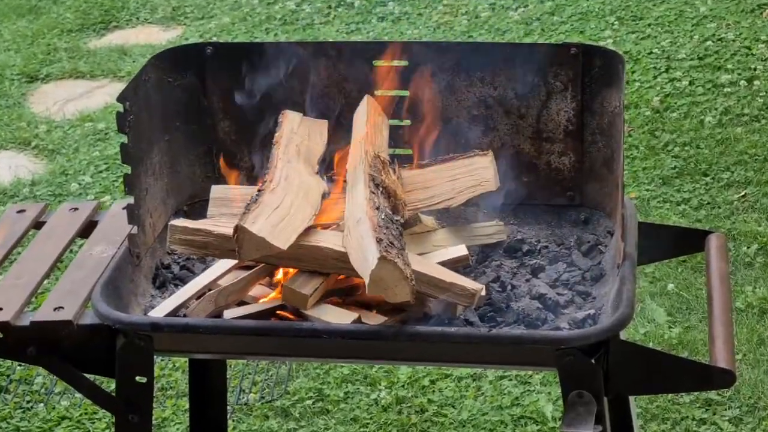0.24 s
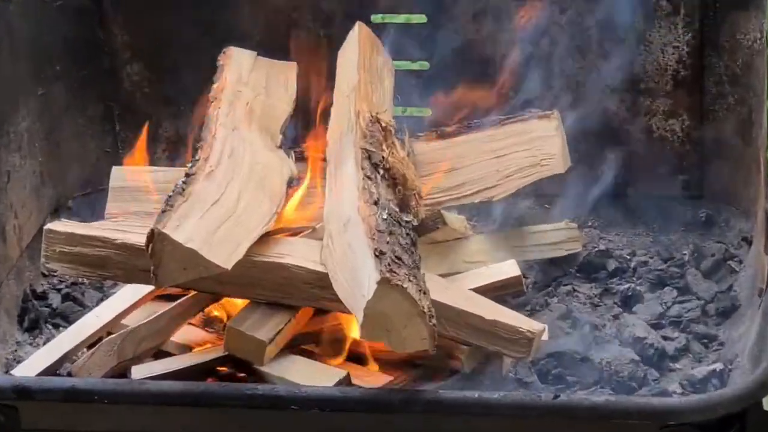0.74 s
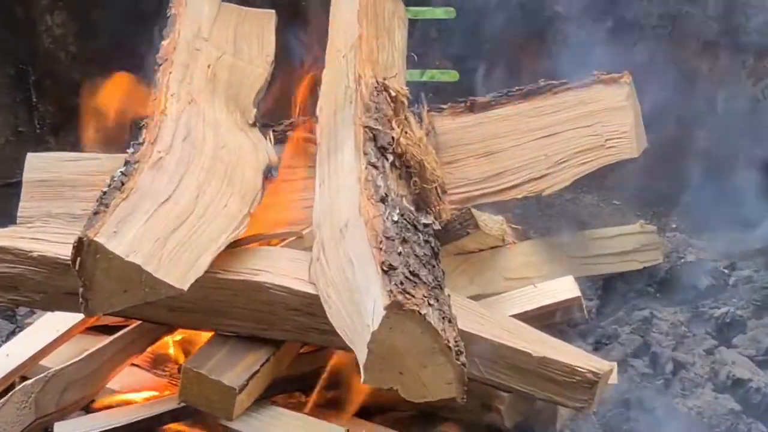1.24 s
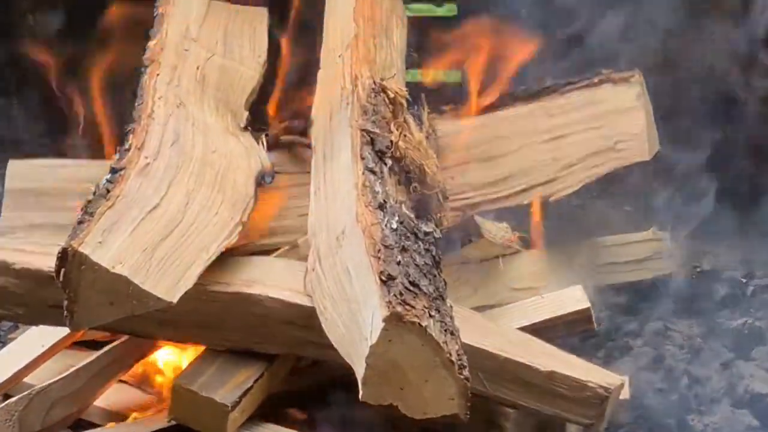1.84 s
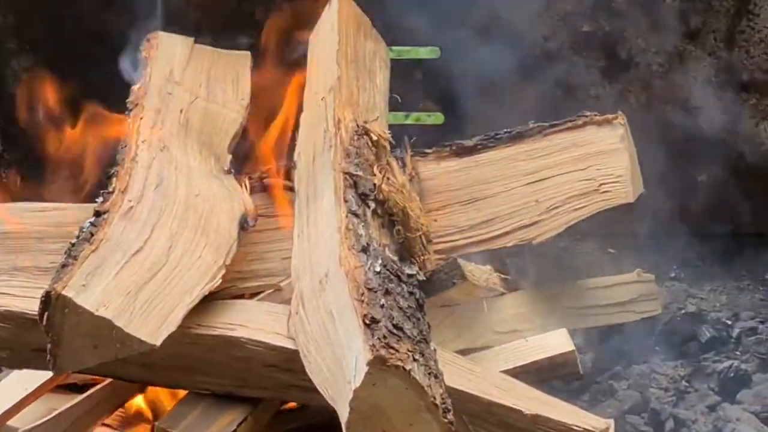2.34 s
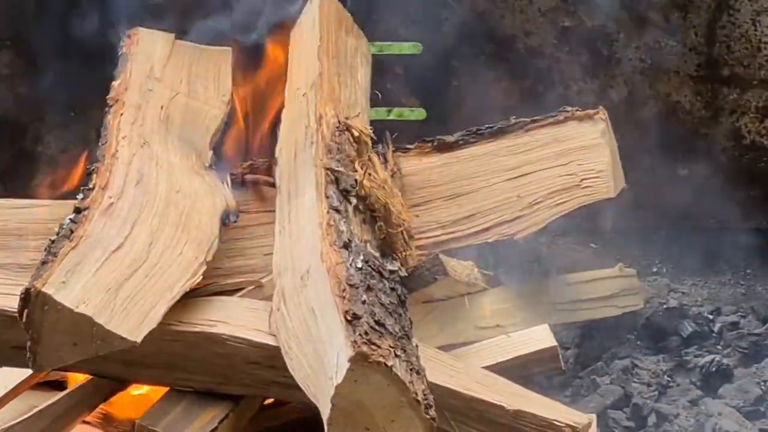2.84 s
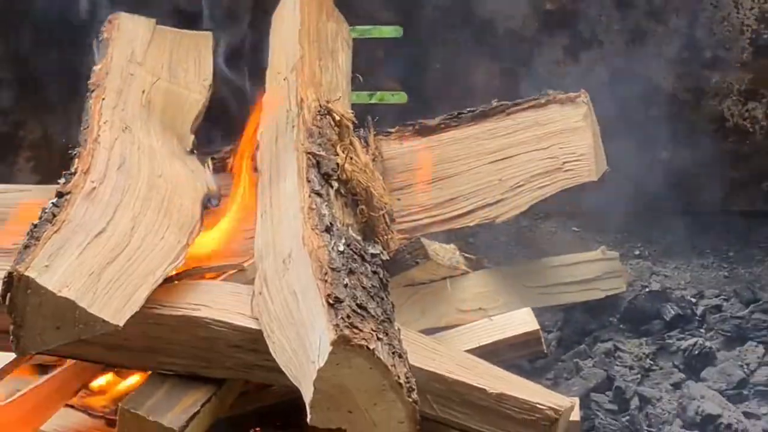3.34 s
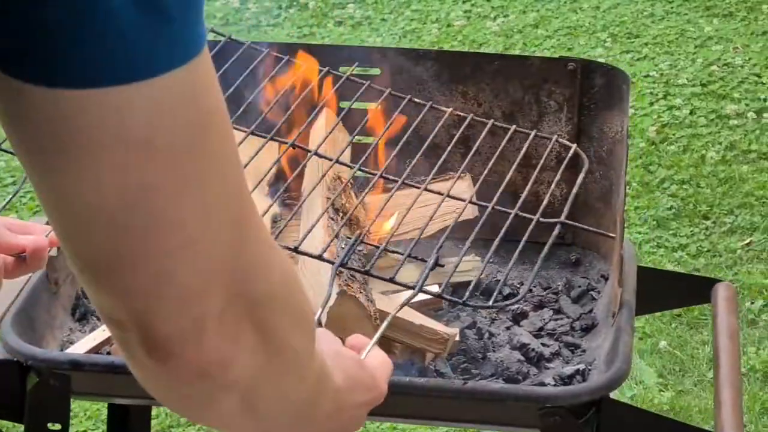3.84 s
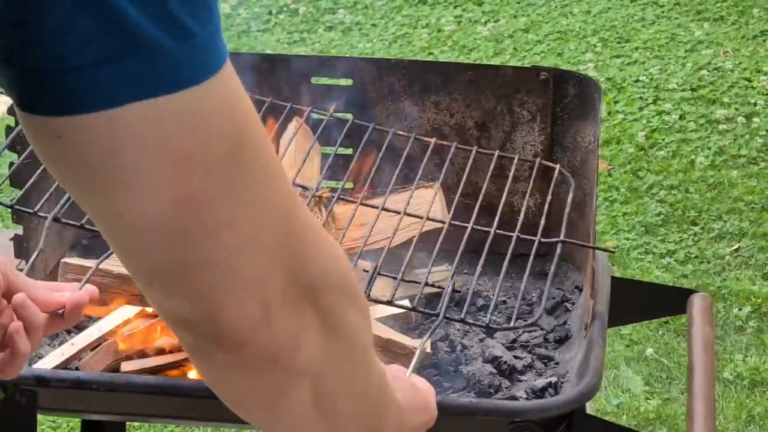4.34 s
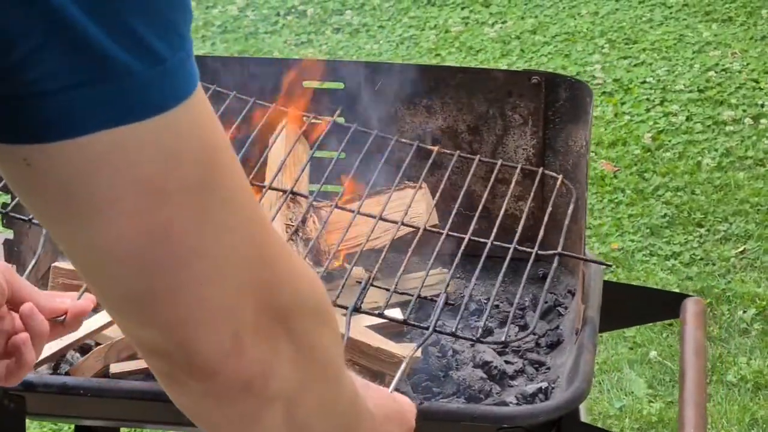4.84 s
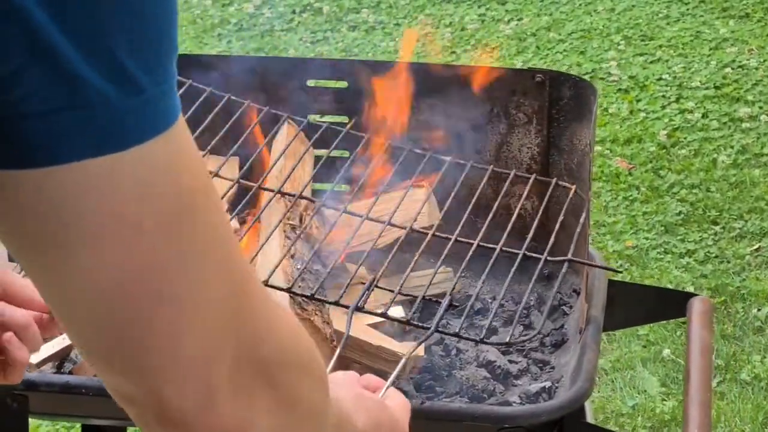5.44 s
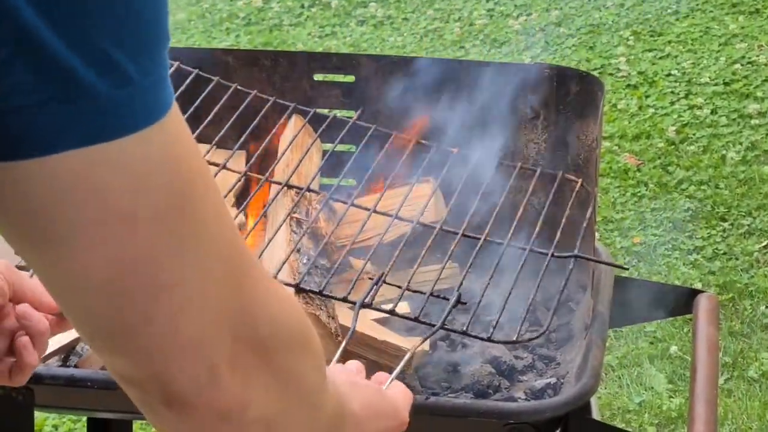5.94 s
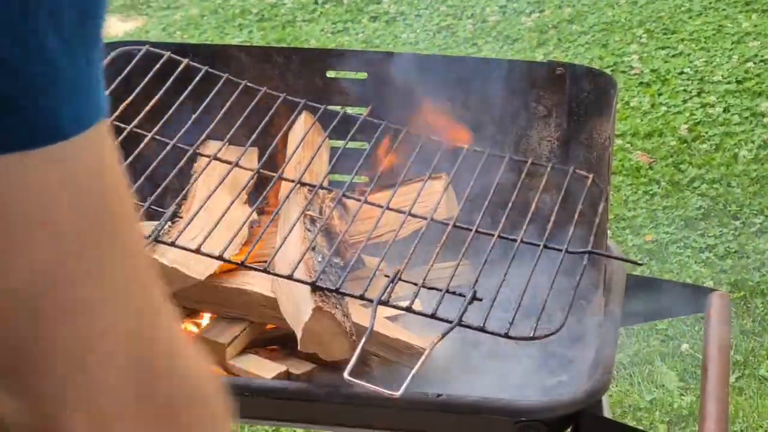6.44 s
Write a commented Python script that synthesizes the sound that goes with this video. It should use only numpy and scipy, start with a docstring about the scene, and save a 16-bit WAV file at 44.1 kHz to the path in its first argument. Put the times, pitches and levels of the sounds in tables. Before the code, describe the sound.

Close to an outdoor grill, firewood crackles with uneven snaps, each with a slight metallic ring and a soft echo off nearby walls. A quiet rumble runs underneath, with small hisses and one stronger gust on the microphone. The sound cuts out for an instant, then a wire grate slides and clanks over the rim several times as the wood keeps popping and the bark faintly sizzles.

```python
"""On a lawn between walls, split logs burn in a sheet-metal grill, heard close up. Sap pockets pop and
ring the basin, embers tick, steam hisses and damp bark sizzles over a low roar and far traffic.
Wind buffets the microphone among low thumps. After a blink of silence a wire grate slides and knocks over
the rim while the fire crackles on, with two thin whistles. The walls echo the pops and the grate."""
import sys
import numpy as np
from scipy import signal
from scipy.io import wavfile
from scipy.ndimage import uniform_filter1d

SR = 44100
rng = np.random.default_rng(int(sys.argv[2]) if len(sys.argv) > 2 else 0)


def generate_wav(sig):
    """Save sig (samples, or channels by samples) to the path in sys.argv[1] as 16-bit PCM at SR."""
    pcm = np.round(np.clip(np.atleast_2d(sig).T, -1, 1) * 32767).astype(np.int16)
    wavfile.write(sys.argv[1], SR, pcm)


N = 295029

# tone of the background bed: f/Hz, relative level per Hz/dB
BED_SPECTRUM = [(100, -23), (135, -3), (358, -5.5), (634, -14), (818, -9.5), (1230, -15.5), (1950, -14.5),
                (2600, -17.5), (4020, -20), (6150, -24.5), (8000, -34), (9800, -36.5), (12500, -32),
                (16000, -51)]
BED_DB, LATE_BODY_DB, LATE_TREBLE_DB = -49.5, 2.16, 1.5  # overall level; lifts after the silence
SILENCE_S = (3.459, 3.509)

# wind gusts and low thumps: t/s, hold/s, wind level/dB, low roar or thump level/dB
LOW_SWELLS = [(0.46, 0.15, -45.5, -54), (0.68, 0.055, -52, -51), (0.86, 0.037, -46, -49),
              (1.0, 0.054, -55, -50), (1.15, 0.04, -55, -58), (1.82, 0.033, -51, -50),
              (2.3, 0.36, -53, -51), (2.84, 0.042, -25, -41), (2.99, 0.023, -32.5, -38),
              (3.17, 0.016, -38, -44.5), (3.28, 0.03, -46.5, -52), (4.1, 0.01, -44.5, -39),
              (4.25, 0.013, -57, -38.5), (4.93, 0.038, -48, -58), (5.83, 0.03, -66, -46),
              (6.6, 0.04, -58, -51)]
ROAR_DB, BREEZE_DB, FLICKER_DB = -51.5, -60, 4  # roar and wind between the swells

# pops and knocks: t/s, level/dB, thud/dB, knock/dB, sizzle/dB, tail/dB, tail t60/s, left minus right/dB,
# log ring f/Hz, lead-in level/dB; thud, knock, sizzle, tail and lead-in are relative to the pop's level
POPS = [(0.1457, -48.5, -1, -1, -4, 4, 0.15, 0.0, 1350, -15),
        (0.177, -40.5, 6, -6, -8, 1.5, 0.063, -2, 939, -15),
        (0.248, -40.5, -28, -29, 12.5, -2.5, 0.12, 0, 4850, -11),
        (0.471, -42, -20, -17, -4, -4, 0.14, 1, 2250, -16),
        (0.5493, -50.5, -14, -12, 2, -7, 0.15, -1, 1800, -16),
        (0.8178, -27.5, 6.5, 17, -5, -5, 0.1, 0.5, 1200, -12),
        (0.836, -20.5, -2.5, 5, -3, -5, 0.12, -1, 980, -8),
        (1.1161, -12.5, -25, -5, 2.5, 1, 0.19, 0, 2870, -1),
        (1.2606, -15, -31, -4, -4, -4.5, 0.13, 0, 1295, -9.5),
        (1.492, -42.5, -12, -12, 5, -3.5, 0.19, 1, 1220, -9),
        (1.5356, -45.5, 3, 2, -15, -8, 0.1, 5, 1120, -26),
        (1.6, -58.5, -8, -10, 10, -3, 0.13, 6, 1030, -12),
        (1.8005, -35, -20, -7, 8, -2.5, 0.17, 1.5, 3200, -10),
        (1.85, -42.5, 9.5, 16, -1.5, 4.5, 0.054, -1.5, 1210, -4),
        (1.87, -42, -15, -16, 1, -5, 0.17, 1, 1200, -16),
        (1.9257, -31.5, -3, -11, -3, -1, 0.11, -4, 1470, -14),
        (1.9641, -33.5, 4, 4, 2.5, -4.5, 0.1, -0.5, 1420, -5),
        (2.2293, -51.5, 10.5, 3, -20, -7, 0.17, 1.0, 1640, -16),
        (2.31, -27.5, -13, -7, 3, -1, 0.13, -0.5, 3100, -11),
        (2.3943, -52, 2, -6, -7, 5.5, 0.33, -2, 1020, -16),
        (2.47, -37, -8, -13, 10.5, -2.5, 0.13, -1.0, 5740, -2),
        (2.4938, -45.5, 9, 12, -10, -9, 0.097, -1, 1190, -7),
        (2.631, -57, -2, -12, 9, -10, 0.14, 1.0, 1630, -16),
        (2.8285, -51, 10, 15, -41, -2.5, 0.22, 0, 1640, 4),
        (2.887, -42.5, -12, -1.5, -6.5, 1, 0.24, 0, 1050, -4),
        (3.074, -34, -4.5, -6, -8, -4, 0.15, -1, 2960, -14),
        (3.14, -25, -10.5, -9, 9.5, -0.5, 0.095, -0.5, 3860, -8.5),
        (3.5617, -27.5, -7.5, -5.5, 0, -1, 0.19, -1, 3030, 3.5),
        (3.6726, -22.5, -8.5, -2, -6.5, -1.5, 0.11, -0.5, 3120, -20),
        (3.7535, -22.5, -20, -32, 2, -8, 0.15, -1, 5020, -13),
        (3.8564, -40.5, -12, -19, -5, -5, 0.14, -2.5, 2190, -18),
        (3.9295, -45, -4, 3.5, -5.5, -1.5, 0.12, -3.5, 2010, -16),
        (4.0581, -20, -18, -9, -8.5, -2.5, 0.15, -1, 3330, -15),
        (4.087, -14, -9.5, -4.5, -3.5, -3, 0.13, -1, 3280, -25),
        (4.2074, -23.5, -24, -18, -11, 4, 0.086, -9, 3160, -25),
        (4.215, -6.5, -12, -5, -1.5, -1.5, 0.14, -0.5, 5520, -12),
        (4.355, -8.5, -15, -3, -12, 1.5, 0.15, -0.5, 1380, -1),
        (4.5383, -47.5, -2, -13, -4, 6.5, 0.24, -1, 2050, -17),
        (4.6526, -26.5, -3, 10.5, -17, -4, 0.089, -3, 1290, -18),
        (4.707, -42, -12, -4, -2, -10, 0.14, -3.0, 1620, -16),
        (4.8245, -22, -11, -5, -11, -1.5, 0.21, 0.5, 3130, 0),
        (5.0471, -37.5, -17, -3, 3.5, -3, 0.18, -1, 1980, -18),
        (5.1642, -44.5, -20, -1, -9, 4.5, 0.16, -4, 2070, -16),
        (5.2103, -35, -12, -4, -1, 4, 0.13, -1.5, 2180, -9),
        (5.3279, -20.5, -14.5, -10.5, 4, -1, 0.14, -1.5, 3100, -13),
        (5.6187, -43, -5, -6, -7, 8.5, 0.16, -3.0, 1370, -16),
        (5.8271, -42.5, 6, 14, -32, 3.5, 0.15, 1, 1273, -19),
        (5.8646, -58, 19, 3, -12, -10, 0.15, -2.0, 1307, -10),
        (5.901, -36.5, -23, -3, -9.5, 9.5, 0.072, 0, 1010, -16),
        (6.2568, -31, 8.5, 9.5, -17, -2, 0.087, -1, 1250, -5),
        (6.2771, -36, -15, -26, -8, 8, 0.1, -2, 1194, -16),
        (6.4023, -39, -13, -2, -3, 3, 0.094, -1, 1210, -20),
        (6.5026, -43, -15, -13, -16, 8.5, 0.15, -5, 3000, -11)]
# a pop's thud, knock, crack and sizzle bands:
# low f/Hz, high f/Hz, crack decay/s, factor on tail t60, stereo likeness/0-1, left minus right/dB
POP_BANDS = [(192, 520, 0.0034, 2.58, 0.97, -1), (731, 1670, 0.0017, 1.48, 0.21, 1),
             (1820, 6360, 0.0018, 1.274, 0.05, 3.5), (7130, 15300, 0.0021, 1.03, 0.02, -1)]
# modes of the sheet-metal basin: f/Hz, relative level/dB, t60/s before the cap in basin_ring()
BASIN_MODES = [(295, -20, 0.66), (799, -6, 0.22), (1030, -14, 0.14), (1340, -3, 1.2), (1975, -1, 0.1),
               (3000, 0, 0.13), (3213, 0.5, 0.17), (3425, -6.5, 0.096), (4240, -21, 0.17), (4720, -2, 0.15),
               (4460, -10.5, 0.17), (4880, -26, 0.18), (5740, -5.5, 0.095)]
LEAD_IN_S, TAIL_BUILD_S = 0.0061, 0.004
SNAP_DB, CRACK_DB, WOOD_DB, BASIN_DB = 6, 7, -5.5, -12  # trims within a pop; snap is its first instant

# soft rushes: t/s, hold/s, level/dB
RUSHES = [(0.42, 0.68, -59), (3.78, 0.19, -61), (4.98, 0.33, -57)]
# jets of steam: t/s, hold/s, level/dB
STEAM_JETS = [(1.735, 0.045, -44.5), (3.16, 0.092, -49)]

# the grate's drone, scrape, groan, rasp and high ring:
# f/Hz (None if it bends), width/Hz, rub low f/Hz, rub high f/Hz, rub over ring/dB, stereo likeness/0-1
GRATE_MODES = [(None, 41, 290, 590, -11, 0.88), (None, 40, 650, 1700, -3, .4),
               (215, 24, 128, 252, -5, 0.99), (2080, 260, 1570, 3050, 4.5, 0.34),
               (3039.5, 76, 2502, 3770, -3.5, 0.3)]
# envelope of each of those five on a slip: delay/s, rise/(dB/s), fall/(dB/s)
SLIP_ENVELOPES = [(0.03, 447, 202), (0.002, 699, 205), (0.0035, 600, 128), (0.00099, 1500, 185),
                  (0.00067, 1800, 305)]
# slips on the rim: t/s, hold/s, drone/dB, scrape/dB, groan/dB, rasp/dB, high ring/dB,
# drone f/Hz, scrape f/Hz
SLIPS = [(3.525, 0.018, -57, -52, -53, -47.5, -56, 305, 1246),
         (3.562, 0.02, -47, -45, -44, -44.5, -51, 293, 1294),
         (3.672, 0.019, -44.5, -47.5, -48, -45, -52, 311.8, 1280),
         (4.775, 0.025, -61, -58, -56, -43, -52, 333.3, 1320),
         (4.827, 0.018, -31, -34.5, -46, -28.5, -26, 360, 1345),
         (5.06, 0.13, -58, -68, -56, -56, -74, 305, 1260),
         (5.215, 0.028, -54, -51, -61, -49, -55, 319.6, 1403),
         (5.49, 0.04, -36.5, -42.5, -60, -70, -50.5, 314.3, 1205),
         (5.54, 0.015, -31.5, -40, -29.5, -59, -51, 307.2, 1223),
         (5.832, 0.013, -29, -44, -41.5, -46.5, -47, 284.6, 1350),
         (5.995, 0.015, -51, -63, -50.5, -55, -52.5, 325, 1270),
         (6.14, 0.053, -71, -57.5, -51.5, -54, -61, 298, 1345)]

# whistles: t/s, hold/s, level/dB, start f/Hz, top f/Hz, climb/s
WHISTLES = [(3.555, 0.07, -50.5, 7160, 8900, 0.05), (5.81, 0.027, -66, 7000, 7000, 0.012)]
# spells of frying bark: t/s, hold/s, level/dB
SIZZLES = [(4.5, 0.33, -60), (4.95, 0.6, -69)]


def undb(db):
    return 10 ** (np.asarray(db) / 20)


def level(x, db):
    return x * undb(db) / np.sqrt(np.mean(x ** 2))


def band(x, lo_hz, hi_hz, order=2):
    sos = signal.butter(order, [lo_hz, min(hi_hz, 20000)], "bandpass", fs=SR, output="sos")
    return signal.sosfilt(sos, x)


def pan(lean_db):
    """Stereo gains with the left lean_db above the right."""
    return undb([[lean_db / 2], [-lean_db / 2]])


def stereo_noise(like, size=N):
    """White noise, from wide (likeness 0) to mono (1)."""
    mid, side = rng.standard_normal((2, size))
    return (np.sqrt(1 + like) * mid + np.sqrt(1 - like) * side * np.array([[1], [-1]])) / np.sqrt(2)


def wander(rate_hz):
    """Smooth random modulation with a spread near 1."""
    hold = int(SR / rate_hz)
    steps = np.repeat(rng.standard_normal(N // hold + 1), hold)
    return 0.77 * uniform_filter1d(uniform_filter1d(steps, hold), hold)[:N]


def noisy_tone(hz, width_hz, like, steady=0.71):
    """A pure core in a narrow band of noise, on a fixed or gliding pitch."""
    phase = 2 * np.pi * np.cumsum(np.broadcast_to(hz, N)) / SR
    lowpass = signal.butter(2, width_hz / 2, fs=SR, output="sos")
    slow = [level(signal.sosfilt(lowpass, stereo_noise(like)), 0) for _ in range(2)]
    return level((steady + slow[0]) * np.cos(phase) + slow[1] * np.sin(phase), 0)


def swells(cues, rise, fall, delay_s=0., column=2):
    """Envelope that rises to each cue's level, holds and falls; slopes in dB/s."""
    t, power = np.arange(N) / SR, 0
    for cue in cues:
        since = t - cue[0] - delay_s
        db = cue[column] + rise * np.minimum(since, 0) - fall * np.maximum(since - cue[1], 0)
        power = power + undb(2 * db)
    return np.sqrt(power)


def current_cue(cues, lead_s):
    """Per sample: the columns of the latest cue, picked up lead_s early, and the seconds since it."""
    t, cues = np.arange(N) / SR, np.array(cues)
    k = np.maximum(np.searchsorted(cues[:, 0] - lead_s, t) - 1, 0)
    return cues[k].T, t - cues[k, 0]


def garden_bed():
    """Steady burning and far traffic: third-octave bands that drift together and flicker alone."""
    out, noise = 0, rng.standard_normal((2, 2, N))  # neighbouring bands draw on unrelated noise
    late, drift = np.arange(N) / SR > SILENCE_S[0], wander(1.18)
    body_db = LATE_BODY_DB * late + 2.3 * drift
    treble_db = LATE_TREBLE_DB * late + 0.4 * drift
    curve_hz, curve_db = np.transpose(BED_SPECTRUM)
    for k, hz in enumerate(100 * 2 ** np.arange(0, 7.4, 1 / 3)):
        db = np.interp(np.log(hz), np.log(curve_hz), curve_db) + 10 * np.log10(hz)
        high = np.clip(np.log2(hz / 2000) / 4.7, 0, 1)
        db = db + (1 - high) * body_db + high * treble_db + 2.9 * wander(8)
        mid, side = level(band(noise[k % 2], hz / 2 ** (1 / 6), hz * 2 ** (1 / 6)), 0)
        width = 0.19 + 0.91 / np.sqrt(1 + (1100 / hz) ** 3)  # the bass is nearly mono
        out = out + undb(db) * (mid + width * side * np.array([[1], [-1]])) / np.sqrt(1 + width ** 2)
    return level(out, BED_DB)


def roar_and_wind():
    """A low roar flickers and swells into thumps; wind buffets the microphone lower still."""
    surge = np.hypot(undb(ROAR_DB + FLICKER_DB * wander(15)), swells(LOW_SWELLS, 260, 230, column=3))
    wind = np.hypot(undb(BREEZE_DB + FLICKER_DB * wander(6.8)), swells(LOW_SWELLS, 260, 230))
    roar = noisy_tone(80, 33.6, 0.94) * surge
    rumble = noisy_tone(28, 28, 0.86) + undb(3) * noisy_tone(58, 16.7, 1)
    buffet = level(rumble, 0) + level(band(stereo_noise(0.83), 162, 290), -19.5)
    return (roar + buffet * wind) * pan(-1)


def ember_ticks(per_s=5.5, softest_db=-76, decay_s=0.011):
    """Embers tick at random, faint and bright."""
    when, strength = rng.random((int(per_s * N / SR), 2)).T
    hits = np.zeros(N)
    hits[(when * N).astype(int)] = undb(softest_db - 1.6 * np.log(1 - strength))
    envelope = signal.lfilter([1], [1, -np.exp(-1 / (decay_s * SR))], hits)
    return level(band(stereo_noise(0.22), 3600, 20000), 0) * envelope


def sap_pops():
    """A short rising rasp, a sharp crack, a ragged tail of splinters and echoes; log and basin ring."""
    lead = SR // 40
    out, t = np.zeros((2, N + SR)), np.arange(-lead, SR // 5) / SR
    after = np.maximum(t, 0)
    snap = undb(SNAP_DB) * (t == 0)
    build_up = 1 - np.exp(-after / TAIL_BUILD_S)
    for at_s, db, thud_db, knock_db, sizzle_db, tail_db, t60, pan_db, wood_hz, lead_in_db in POPS:
        splinters = np.repeat(rng.standard_normal(len(t) // 64 + 1), 64)[:len(t)]  # 1.5 ms apart
        lead_in = undb(lead_in_db) * np.exp(np.minimum(t, 0) / LEAD_IN_S)
        wood_band = (wood_hz / 1.067, wood_hz * 1.061, .002, .8, .5, 0)
        trims_db = (thud_db, knock_db, 0, sizzle_db, WOOD_DB)
        pop = 0
        for (lo, hi, crack_s, stretch, like, lean_db), trim_db in zip(POP_BANDS + [wood_band], trims_db):
            crack = undb(CRACK_DB) * np.exp(-after / crack_s)
            tail = undb(tail_db - 60 * t / max(t60 * stretch, .02) + 2.6 * splinters) * build_up
            envelope = np.where(t < 0, lead_in, crack + tail)
            burst = band((stereo_noise(like, len(t)) + snap) * envelope, lo, hi, order=3)
            pop = pop + level(burst, trim_db) * np.sqrt(np.mean(envelope ** 2)) * pan(lean_db)
        ring = undb(BASIN_DB) * basin_ring(t, thud_db, knock_db)
        start = int(at_s * SR) - lead
        out[:, start:start + len(t)] += (0.31 * pop + ring) * undb(db) * pan(pan_db)
    return out[:, :N]


def basin_ring(t, thud_db, knock_db):
    """Sheet metal rings briefly; each blow lands elsewhere and gets its own mix of modes."""
    hz, mode_db, t60 = np.transpose(BASIN_MODES)[:, :, None]
    strike, detune, spread = rng.standard_normal((len(hz), 3)).T[:, :, None]
    tilt_db = np.interp(np.log(hz), np.log([400, 1200, 3500]), [thud_db, knock_db, 0])
    t60 = np.minimum(t60, .065 * (2000 / hz) ** 0.53)  # the cap is tighter on high modes
    modes = undb(mode_db + 4.5 * strike + tilt_db - 60 * np.maximum(t, 0) / t60) * (t > 0)
    phase = 2 * np.pi * hz * (1 + 0.016 * detune) * t
    right_shift = spread * np.minimum(hz / 1500, 1.5)
    return np.array([np.sum(modes * np.sin(phase + shift), axis=0) for shift in (0, right_shift)])


def wall_echo(x, t60_s=0.55, wet_db=-22.5):
    """Nearby walls and fences return a smooth, soft-edged tail."""
    t = np.arange(SR // 2) / SR
    tail = band(stereo_noise(0.16, len(t)), 400, 9000) * undb(-60 * t / t60_s) * np.minimum(t / 0.017, 1)
    tail = undb(wet_db) * tail / np.sqrt(np.sum(tail[0] ** 2))
    return signal.fftconvolve(x.mean(axis=0)[None], tail, axes=1)[:, :N]


def soft_rush():
    """A narrow, wavering breath near 2 kHz that eases in and drops away."""
    breath = noisy_tone(2050 * (1 + 0.02 * wander(6)), 420, 0.33, steady=0.1)
    return breath * swells(RUSHES, rise=70, fall=320)


def steam_hiss():
    """Steam spurts from the end grain of a log."""
    jet = level(band(stereo_noise(0.17), 1600, 3200, order=1), 0)
    return jet * swells(STEAM_JETS, rise=1200, fall=260)


def grate_slide():
    """Wire slips on the rim and shakes five resonances, each over a broad rub; two bend with the grate."""
    out = 0
    (*_, drone_hz, scrape_hz), since = current_cue(SLIPS, lead_s=.04)
    bends = drone_hz - 60 * np.clip(since, 0, .2), scrape_hz  # the drone sags 60 Hz/s
    for k, (hz, width_hz, lo_hz, hi_hz, rub_db, like) in enumerate(GRATE_MODES):
        delay_s, rise, fall = SLIP_ENVELOPES[k]
        ring = noisy_tone(hz or bends[k], width_hz, like, steady=0.86)
        rub = level(band(stereo_noise(like), lo_hz, hi_hz), rub_db)
        judder = level((ring + rub) * undb(1.9 * wander(60)), 0)
        out = out + judder * swells(SLIPS, rise, fall, delay_s, column=k + 2)
    ash = band(stereo_noise(0.18), 4000, 15000, order=1) * undb(5.3 * wander(200))
    delay_s, rise, fall = SLIP_ENVELOPES[1]  # ash grinding under the wire rides the scrape's envelope
    return out + level(ash, -17.5) * swells(SLIPS, rise, fall, delay_s, column=3)


def whistles(sag_hz_per_s=2000):
    """Thin, fluttering tones, perhaps sap gas; the first climbs, and both sag."""
    (*_, start_hz, top_hz, climb_s), since = current_cue(WHISTLES, lead_s=.1)
    climb_hz = top_hz - (top_hz - start_hz) * np.clip(-since / climb_s, 0, 1)
    tone = noisy_tone(climb_hz - sag_hz_per_s * np.clip(since, 0, .3), 520, .4, steady=.3)
    return tone * undb(5 * wander(60)) * swells(WHISTLES, rise=290, fall=110)


def bark_sizzle():
    """Damp bark fries: gritty treble that comes and goes."""
    grit = band(stereo_noise(0.2), 6300, 15800) * undb(4.5 * wander(300) + 2.7 * wander(15))
    return level(grit, 0) * swells(SIZZLES, rise=140, fall=75)


def scene():
    """Pops and grate feed the echo; the fine fire detail and the beds stay dry."""
    near = sap_pops() + grate_slide()
    echo = wall_echo(near)
    detail = ember_ticks() + whistles() + steam_hiss() + soft_rush() + bark_sizzle()
    return near + echo + detail + roar_and_wind() + garden_bed()


def record(dry, top_hz=15900):
    """The mix mutes for 50 ms, leans slightly right, clips at full scale and loses its very top."""
    mute_s, resume_s = SILENCE_S
    gate = np.interp(np.arange(N) / SR, [mute_s - .004, mute_s, resume_s, resume_s + .002], [1, 0, 0, 1])
    clipped = np.clip(dry * gate * pan(-1.4), -1, 1)
    return signal.sosfilt(signal.ellip(12, .2, 70, top_hz, fs=SR, output="sos"), clipped)


dry = scene()
out = record(dry)
generate_wav(out)
```